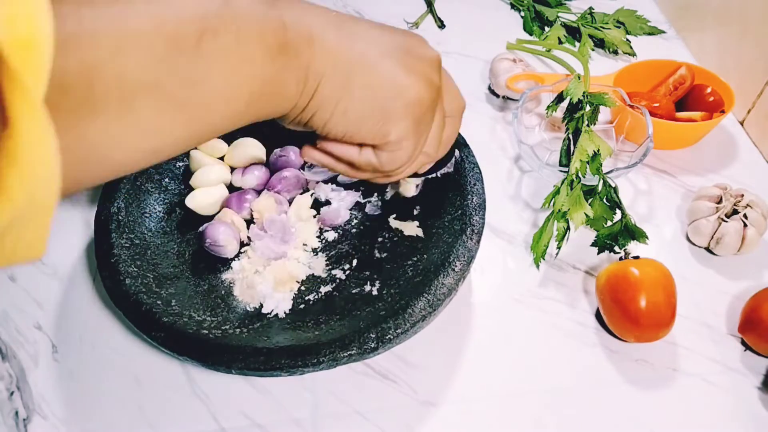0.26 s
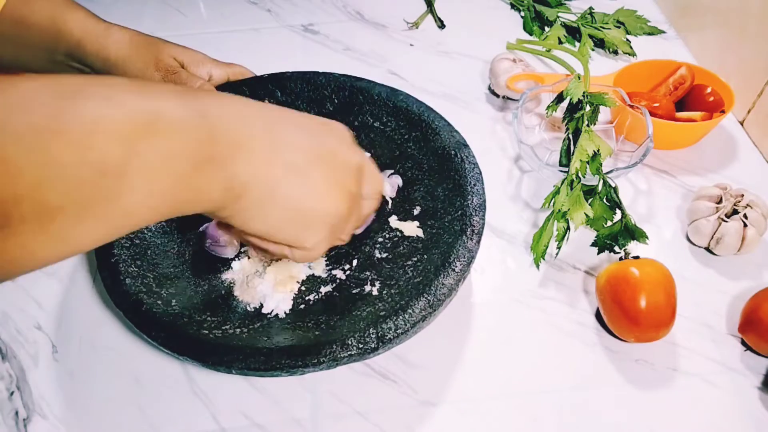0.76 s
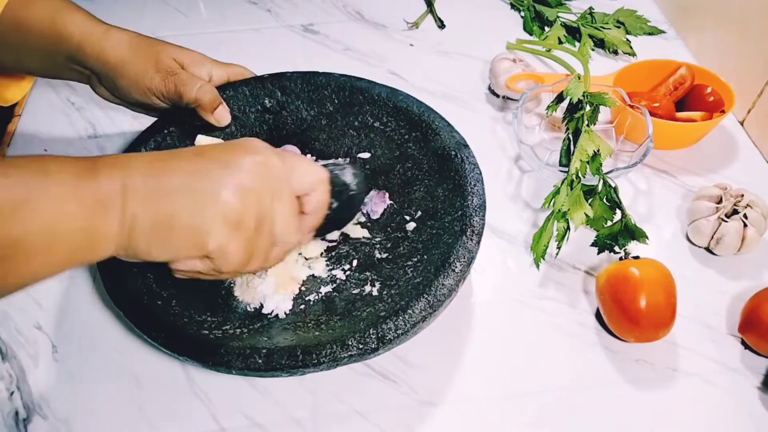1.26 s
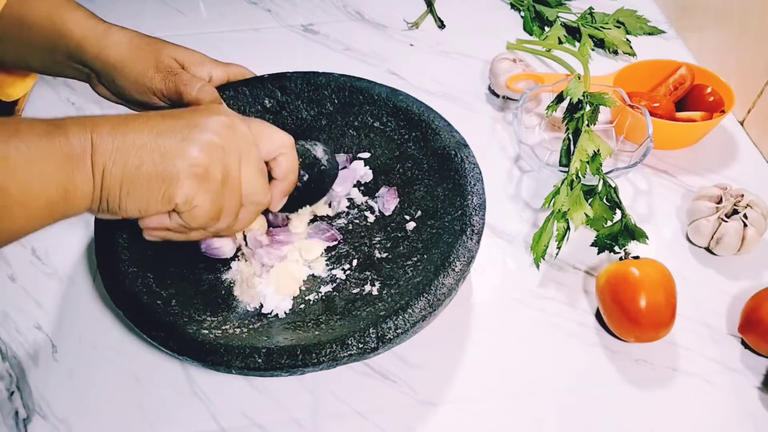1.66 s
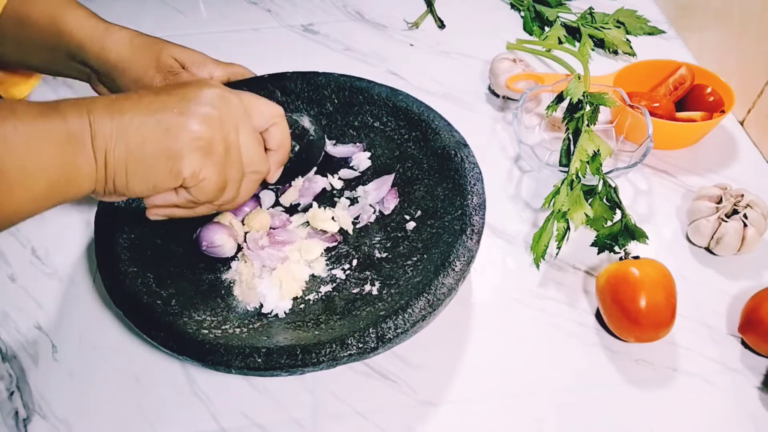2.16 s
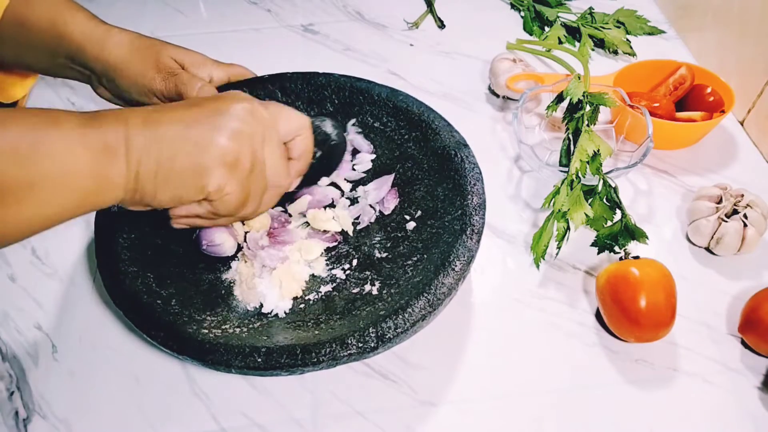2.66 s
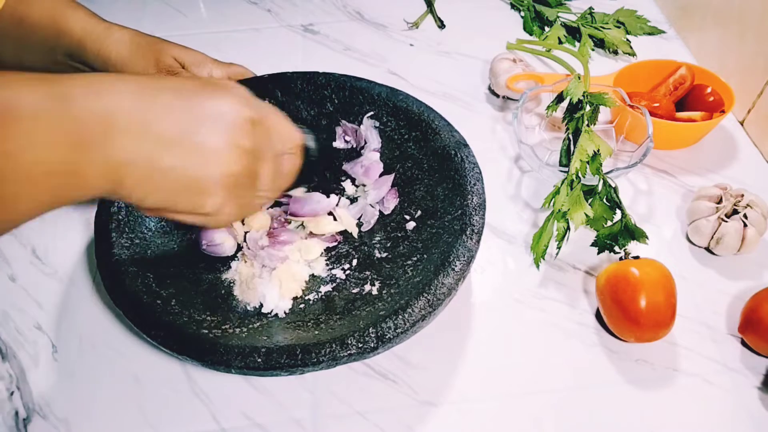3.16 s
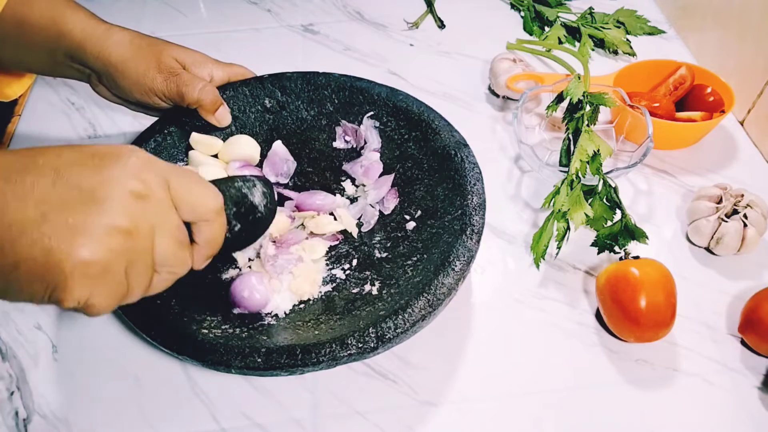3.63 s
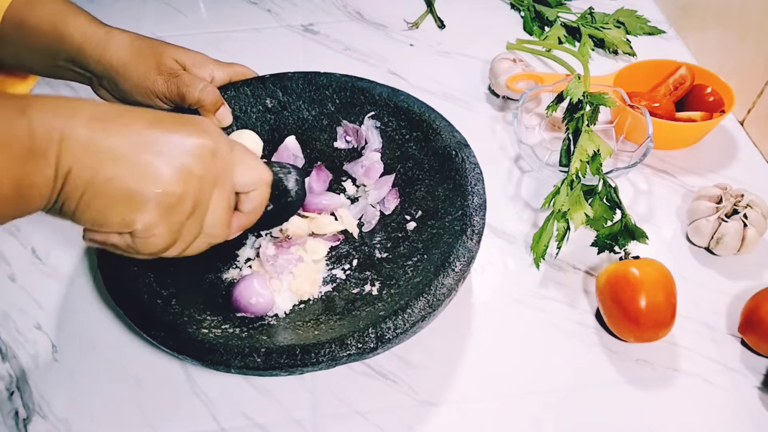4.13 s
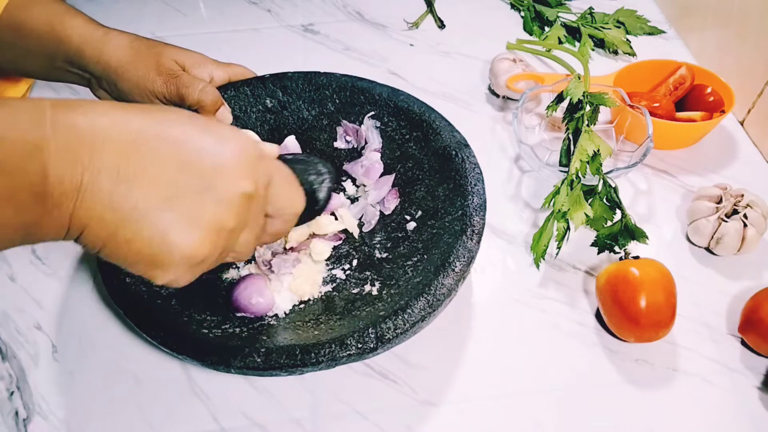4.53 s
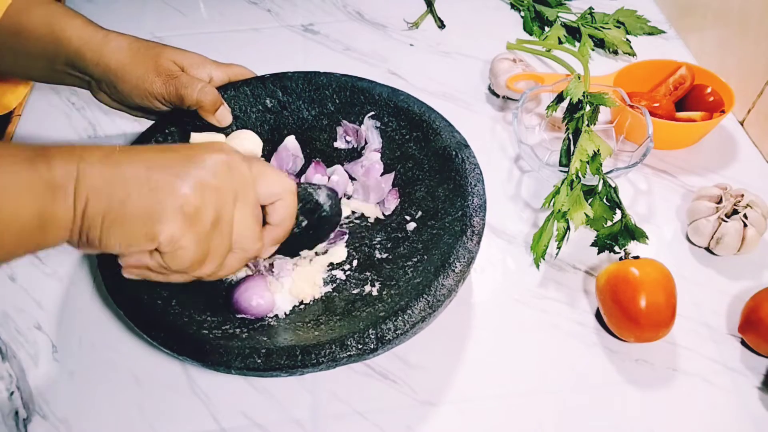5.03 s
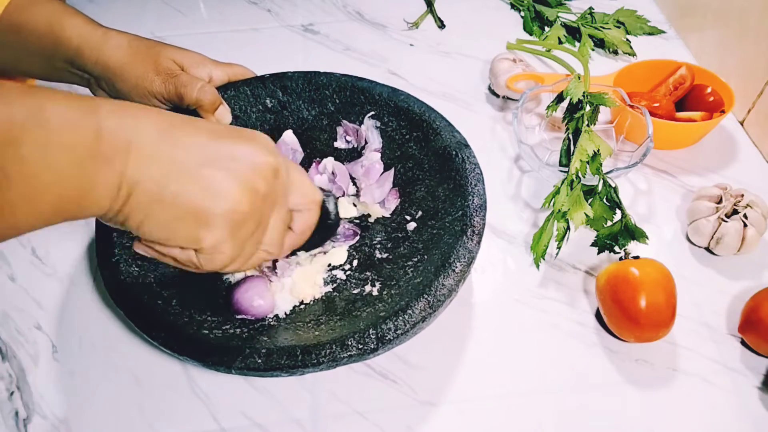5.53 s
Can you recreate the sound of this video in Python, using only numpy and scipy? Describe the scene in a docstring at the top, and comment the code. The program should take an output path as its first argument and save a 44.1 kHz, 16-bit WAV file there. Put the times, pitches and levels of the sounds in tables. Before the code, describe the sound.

A stone pestle works shallots and garlic in a stone mortar, close up in a home kitchen. In the first half second, a few knocks ring both stones, with a gritty scrape. From about 0.5 to 3 seconds, push after push grinds the pulp, and skins burst in crisp, crackling clusters near 0.9, 1.3, 1.8, 2.4 and 3 seconds, with occasional stone clicks. The work eases to faint scraping and small crackles until 4 seconds, then picks up with a crunch and two light knocks. The sharpest crack lands at 4.8 seconds. A bright knock follows at 5.4 seconds, and scraping continues to the end, near 5.8 seconds. The sound has a bright treble and slight room reverb. A low kitchen rumble and the drone of a distant engine outside run quietly underneath.

```python
"""A stone pestle crushes shallots and garlic in a flat stone mortar, over a low kitchen rumble and the
drone of an engine outside. It opens with knocks that ring both stones, and a gritty scrape. From 0.5 s
to 3 s, push after push grinds the pulp and bursts skins in crackling clusters. The work eases until 4 s,
then the sharpest crack lands at 4.8 s, and a bright knock and more scraping close the scene.
A small microphone with a peak near 9 kHz brightens everything."""
import sys
import numpy as np
from scipy import signal
from scipy.fft import rfft, irfft
from scipy.io import wavfile
from scipy.ndimage import uniform_filter1d

SR = 44100
rng = np.random.default_rng(int(sys.argv[2]) if len(sys.argv) > 2 else 0)


def output_pcm(signal):
    """Save a mono or channel-first signal as 16-bit PCM at the path in sys.argv[1].

    Samples are clipped to [-1, 1] before scaling.
    """
    pcm = np.clip(np.atleast_2d(signal).T, -1, 1) * 32767
    wavfile.write(sys.argv[1], SR, np.round(pcm).astype(np.int16))


N = 255339

# the pestle's modes: (pitch [Hz], level [dB], t60 [s])
PESTLE_MODES = [(2545, 8, 0.022), (2650, 7, 0.022), (4450, -3, 0.015)]
SNAP_WIDTH = 0.56  # a snap's band as a share of its pitch


def gain_of(db):
    return 10 ** (np.asarray(db) / 20)


def unit_rms(x):
    return x / np.sqrt(np.mean(x ** 2) + 1e-20)


def at_hz(points, hz):
    """Read a curve on a log frequency axis."""
    f, value = np.transpose(points)
    return np.interp(np.log(hz + 1), np.log(f + 1), value)


def automation(rows):
    """Timed breakpoints become one curve per column."""
    s, *columns = np.transpose(rows)
    return [np.interp(np.arange(N) / SR, s, c) for c in columns]


def drift(shape, samples):
    """Noise smoothed into a slow wander."""
    return uniform_filter1d(uniform_filter1d(rng.standard_normal(shape), samples), samples)


def equalise(x, points):
    """Causal filter of unit energy with the given spectrum."""
    log_gain = np.log(gain_of(at_hz(points, abs(np.fft.fftfreq(4096, 1 / SR)))))
    taps = np.fft.ifft(np.exp(np.conj(signal.hilbert(log_gain)))).real[:1024]
    return signal.oaconvolve(x, taps / np.linalg.norm(taps))[:N]


def resonate(x, hz, width):
    """Two like resonances in series, gain 1 at the centre."""
    pole = np.exp((2j * np.pi * hz - np.pi * width) / SR)
    for _ in range(2):
        x = 2 * signal.lfilter([1 - abs(pole)], [1, -pole], x).real
    return x


def ring(x, modes):
    """Every impulse sets the decaying modes going."""
    t = np.arange(SR // 2) / SR
    response = sum(gain_of(db - 60 * t / t60) * np.sin(2 * np.pi * hz * t) for hz, db, t60 in modes)
    return signal.oaconvolve(x, response)[:N]


def impulses(s, db):
    train = np.zeros(N)
    np.add.at(train, np.round(np.asarray(s) * SR).astype(int), gain_of(db))
    return train


def grains(per_s, spread_db, clump_db):
    """Tiny slips of random sign, a few large, in clumps some milliseconds long."""
    size = gain_of(spread_db * np.minimum(rng.exponential(1, N), 5))
    size *= rng.random(N) < per_s / SR
    clumps = gain_of(clump_db * unit_rms(drift(N, 300)))
    return unit_rms(size * rng.choice([-1., 1.], N) * clumps)


def engine():
    """A distant engine drones on low multiples of its firing rate, each wavering by itself."""
    # engine speed: (time [s], firing rate [Hz])
    firing = [(0, 23), (1.5, 29.9), (2.7, 26.7), (5.79, 29)]
    # harmonics from the fourth up: (level [dB])
    harmonics = [-1, 1.5, 1.5, 0, -2.5, -7.5]
    waver_db, waver_s = 3.5, 0.58
    cycles = np.cumsum(automation(firing)[0]) / SR
    wavers = drift((len(harmonics), N), round(waver_s * SR))
    tones = (gain_of(db + waver_db * unit_rms(waver)) * np.sin(2 * np.pi * (k * cycles + rng.random()))
             for k, (db, waver) in enumerate(zip(harmonics, wavers), 4))
    return unit_rms(sum(tones))


def room_tone():
    """Faint air, a swelling rumble that lingers in the lowest room modes, and the engine."""
    # colour of the air: (frequency [Hz], level [dB])
    air_eq = [(33, -30.5), (60, -1.5), (240, -12.5), (270, -16.5), (380, -15.5), (800, -29.5), (2000, -35),
              (6000, -43.5), (16000, -41)]
    # low room resonances: (pitch [Hz], width [Hz], level [dB])
    room_modes = [(40.3, 18, -4), (76.5, 23.8, 1), (101, 84, -9)]
    # swells of the low end: (time [s], rumble level [dB], engine level [dB])
    swells = [(0.0, -59, -59.5), (1.95, -53.5, -63.5), (2.27, -64.5, -66), (3.03, -56.5, -57),
              (3.5, -69.5, -60), (3.75, -61, -65), (4.3, -61, -59.5), (4.58, -72, -70.5), (4.74, -57, -63),
              (5.51, -60, -57.5), (5.79, -65, -58.5)]
    spectrum = rfft(rng.standard_normal(N)) * gain_of(at_hz(air_eq, np.fft.rfftfreq(N, 1 / SR)))
    air = gain_of(-62.5) * unit_rms(irfft(spectrum, N))
    drive = rng.standard_normal(N)
    rumble = sum(gain_of(db) * unit_rms(resonate(drive, hz, width)) for hz, width, db in room_modes)
    rumble_db, engine_db = automation(swells)
    return air + gain_of(rumble_db) * rumble + gain_of(engine_db) * engine()


def kitchen_reverb(x):
    """Sparse reflections build over the first wall bounces; each band dies at its own speed."""
    # the kitchen's decay: (frequency [Hz], t60 [s])
    decay = [(500, 1), (16000, 0.26)]
    taps = np.zeros(SR // 2)
    slots = np.arange(100, SR // 2 - 20, 20)
    build_up = np.minimum(slots / SR / .02, 1)
    taps[slots + rng.integers(0, 20, len(slots))] = rng.choice([-1., 1.], len(slots)) * build_up
    hz, t, bands = signal.stft(taps, SR, nperseg=256)
    tail = signal.istft(bands * gain_of(-60 * t / at_hz(decay, hz)[:, None]), SR, nperseg=256)[1]
    return signal.fftconvolve(x, tail / np.linalg.norm(tail))[:N]


def knocks():
    """A blow rings both stones, chatters on briefly in the mortar and thuds into the counter."""
    # stone on stone: (time [s], mortar level [dB], pestle level [dB])
    hits = [(0.002, -54.5, -75), (0.06, -55, -60.5), (0.368, -57, -62.5), (0.398, -63, -74),
            (1.157, -72, -102), (1.351, -74, -56), (1.818, -99, -57.5), (2.461, -64, -60),
            (4.145, -92, -60.5), (4.296, -89, -57), (4.856, -81, -57.5), (5.4, -90, -48)]
    # the mortar's ring: (pitch [Hz], level [dB], t60 [s])
    mortar_modes = [(1233, -1, 0.29), (1260, -3, 0.35), (2800, -4, 0.17), (4500, -4, 0.083),
                    (8700, -8, 0.085)]
    # the counter's thud: (pitch [Hz], level [dB], t60 [s])
    counter_modes = [(78, 7, 0.09), (345, -2.5, 0.037)]
    skid_db, skid_t60_s, thud_db = -0.5, 0.06, 2
    s, mortar_db, pestle_db = np.transpose(hits)
    blows = impulses(s, mortar_db)
    chatter = grains(per_s=4000, spread_db=1.0, clump_db=2.0) / np.sqrt(SR / 600)
    fade = gain_of(skid_db - 60 * np.arange(SR // 10) / SR / skid_t60_s)
    skid = chatter * signal.oaconvolve(blows, fade)[:N]
    thud = ring(impulses(s, np.maximum(mortar_db, pestle_db) + thud_db), counter_modes)
    return ring(blows + skid, mortar_modes) + ring(impulses(s, pestle_db), PESTLE_MODES) + thud


def pushes():
    """Each push swells to a peak and lets go; gives the gains of grit, pulp and pestle hum."""
    # strokes: (peak time [s], rise [s], release [s], grit level [dB], pulp vs grit [dB], hum vs grit [dB])
    strokes = [(0.064, 0.3, 0.2, -40, -6, -7.5), (0.446, 0.058, 0.026, -48, -3, -45),
               (.536, 0.24, 1, -48.5, -8, -24), (.85, 0.19, 0.38, -56.5, -4, -7.5),
               (0.937, 0.11, 0.26, -45, -6, -4.5), (1.159, 0.015, 0.35, -47, -16.5, -44),
               (1.238, 0.032, 0.07, -47, 2.5, -4), (1.334, 0.69, 0.27, -47, -9.5, -8),
               (1.723, 0.37, 0.072, -60, 0, -30), (1.859, 0.23, 0.034, -49.5, -3.5, -28),
               (1.885, 0.044, 0.057, -37.5, -12.5, -35), (2.17, 0.3, 1, -65, -6, -30),
               (2.388, 0.012, 0.035, -47, -3, -5), (2.453, 0.13, 0.64, -47.5, -5.5, -20),
               (2.701, 0.043, 0.31, -45, -7, -33), (2.949, 0.035, 0.22, -51.5, -4.5, -36),
               (3.014, 0.15, 0.31, -48.5, -9.5, -11), (3.431, 0.047, 0.2, -63, -6, -30),
               (3.524, 0.27, 0.14, -64, -7, -22), (3.814, 0.06, 0.083, -69, -6, -35),
               (4.031, 0.36, 0.058, -72.5, -7.5, -35), (4.095, 0.059, 0.29, -50.5, -3.5, -15),
               (4.42, 0.99, 0.42, -66.5, -13.5, -17), (4.679, 0.04, 0.081, -54, -9, -35),
               (4.81, 0.0098, 1, -51, -10, -19), (5.093, 0.35, 0.6, -51, -9.5, -9.5),
               (5.188, 0.56, 0.08, -50, -10, -13), (5.326, 0.03, 0.099, -58.5, -2, -21),
               (5.469, 0.21, 0.38, -47, -11, -8.5), (5.619, 0.037, 0.12, -50.5, -5.5, -8.5),
               (5.78, 0.48, 0.12, -49.5, -11, -12.5)]
    swing_db = 42.5 * np.array([1, 1, 1.7])  # per rise or release; the hum swells and dies faster
    rise_bend, release_bend = 1.08, 0.9  # above 1 rounds the top
    t, power = np.arange(0, N + 64, 64) / SR, 0
    for s, rise_s, release_s, grit_db, pulp_db, hum_db in strokes:
        away = abs(t - s)
        dip = np.where(t < s, (away / rise_s) ** rise_bend, (away / release_s) ** release_bend)
        peak_db = grit_db + np.array([[0], [pulp_db], [hum_db]])
        power += gain_of(peak_db - np.outer(swing_db, dip)) ** 2
    return [np.interp(np.arange(N) / SR, t, np.sqrt(layer)) for layer in power]


def pestle_hum(gain):
    """Rubbing keeps the pestle's modes humming."""
    rub = gain * grains(per_s=3000, spread_db=1.5, clump_db=3.5)
    return ring(rub, PESTLE_MODES) / np.linalg.norm(ring(impulses([0], [0]), PESTLE_MODES))


def snap(x, hz, share):
    """A breaking piece sounds in a broad band round its own pitch, with no bass."""
    width = share * hz
    edge = np.diff(x, prepend=0) / (2 * np.sin(np.pi * hz / SR))
    return resonate(edge, hz, width) * np.sqrt(SR / (np.pi * width))


def fibre_snaps():
    """Fibres tear in short bursts, each size at its own pitch."""
    tear_t60_s, pitches_hz = 0.0091, np.geomspace(6000, 15000, num=6)
    breaks = abs(grains(per_s=150, spread_db=3.5, clump_db=3.5))
    size = np.repeat(rng.integers(0, 6, N // 256 + 1), 256)[:N]
    fade = gain_of(-60 * np.arange(SR // 40) / SR / tear_t60_s)
    tears = unit_rms(signal.oaconvolve(breaks, fade)[:N] * rng.standard_normal(N))
    return sum(snap(tears * (size == k), hz, SNAP_WIDTH) for k, hz in enumerate(pitches_hz))


def patchy(x, spread_db):
    """Pieces differ in size and wetness, so the colour shifts every few milliseconds."""
    bands = signal.stft(x, nperseg=128, noverlap=96)[2]
    patches = uniform_filter1d(rng.standard_normal(bands.shape), size=9, axis=0)
    patches = unit_rms(uniform_filter1d(patches, size=12, axis=1))
    return signal.istft(bands * gain_of(spread_db * patches), nperseg=128, noverlap=96)[1][:N]


def scrape():
    """Under each push grit hisses, fibres snap, pulp crunches lower and the pestle hums."""
    # colour of the grit: (frequency [Hz], level [dB])
    grit_eq = [(1500, -40), (3500, -7), (6000, -4), (9000, -3.5), (12500, -4)]
    # colour of the pulp: (frequency [Hz], level [dB])
    pulp_eq = [(700, -10), (2000, -10), (3400, -5), (5200, 0), (8000, -7), (12000, -52)]
    grit_gain, pulp_gain, hum_gain = pushes()
    snaps = 0.43 * grit_gain * fibre_snaps()
    slips = grains(per_s=12000, spread_db=2.5, clump_db=2.0)
    pulp = slips + 0.83 * grains(per_s=4000, spread_db=2.5, clump_db=-1.0)
    hum = pestle_hum(hum_gain)
    crunch = equalise(slips * grit_gain, grit_eq) + equalise(pulp * pulp_gain, pulp_eq)
    return patchy(crunch, spread_db=3.5) + snaps + hum


def cracks():
    """A piece creaks, bursts and sheds a patter of splinters: brittle skin on top, wet clove below."""
    # pieces bursting: (time [s], skin level [dB], clove vs skin [dB], skin pitch [Hz])
    pieces = [(0.47, -35.5, -37, 13000), (0.9053, -52, -3, 11300), (0.9199, -30.5, -17.5, 8400),
              (0.958, -30, -20, 13100), (1.0078, -44.5, -9, 10100), (1.2022, -35, -38, 7700),
              (1.3302, -27, -40, 11700), (1.3724, -36.5, -32, 10000), (1.7321, -36, -14, 8000),
              (1.744, -46, 8.5, 7500), (1.8302, -34, -11, 10100), (1.8592, -29, -11.5, 9300),
              (1.8803, -37, -12, 9800), (1.8933, -37, -17, 9350), (2.39, -55, -9, 11600),
              (2.413, -48, 3, 9000), (2.4325, -39.5, -6.5, 13800), (2.4447, -37, -1, 9500),
              (2.449, -45, 9, 6950), (2.4528, -46, 11, 8000), (2.4576, -38.5, 14.5, 8400),
              (2.5085, -36, -7, 9450), (2.5322, -40, -6, 8300), (2.7004, -35.5, -9.5, 12700),
              (2.9608, -49, -6, 9740), (2.9797, -32.5, -14, 11100), (3.0001, -40, -17, 11700),
              (3.086, -42, -21, 11500), (3.4228, -42, -45, 10900), (3.434, -49, -36, 9400),
              (3.446, -47, -29, 9900), (3.488, -50.5, -25, 9500), (3.7874, -46, -26, 12200),
              (4.0809, -37, -12, 9300), (4.2953, -46, -6.5, 9500), (4.7953, -21, -14.5, 11800),
              (4.8193, -33, -20, 9250), (4.858, -28.5, -10, 9000), (4.8625, -38, -6.5, 8700),
              (4.961, -49, -14, 7600), (5.0886, -31.5, -43, 13800), (5.4003, -35.5, -4, 10600)]
    skin_rise_ms, clove_rise_ms, clove_hz = 0.26, 0.61, 3240
    creak_db, creak_t60_ms = -23.5, 13
    shed_db, shed_t60_ms = -12.5, 38.4
    ms, track = np.arange(-500, 1500) * 1000 / SR, np.zeros(N)
    rise = np.maximum(ms, 0) / [[skin_rise_ms], [clove_rise_ms]]
    creak = (ms < 0) * gain_of(creak_db - 60 * abs(ms) / creak_t60_ms)
    burst = rise * np.exp(1 - rise)
    shed = np.minimum(rise, 1) * gain_of(shed_db - 60 * ms / shed_t60_ms)
    envelope = creak + burst + shed
    for s, skin_db, clove_db, hz in pieces:
        skin, clove = envelope * rng.standard_normal(envelope.shape)
        layers = np.array([snap(skin, hz, SNAP_WIDTH), snap(clove, clove_hz, share=1.09)])
        makeup = np.linalg.norm(envelope, axis=1) / np.linalg.norm(layers, axis=1)
        start = round((s + ms[0] / 1000) * SR)
        track[start:][:len(ms)] += (makeup * gain_of([skin_db, skin_db + clove_db])) @ layers
    return track


def scene():
    """The mortar up front, with a little reverb, over the room tone."""
    mortar = scrape() + cracks() + knocks()
    return (mortar + gain_of(-14.0) * kitchen_reverb(mortar) + room_tone())[None]


def record(dry):
    """The microphone's port resonance lifts the treble; a low-pass trims the very top."""
    # microphone response: (frequency [Hz], level [dB])
    port_eq = [(6500, -4), (8000, 0), (9150, 7.5), (10500, -1.5), (12200, -6), (16000, -1)]
    low_pass = signal.firwin(511, 15850, window=("kaiser", 9), fs=SR)
    return signal.oaconvolve(equalise(dry[0], port_eq), low_pass, "same")[None]


dry = scene()
out = record(dry)
output_pcm(out)
```